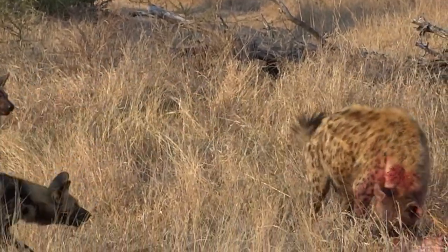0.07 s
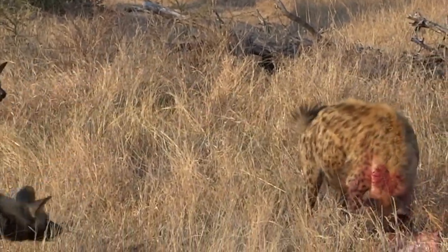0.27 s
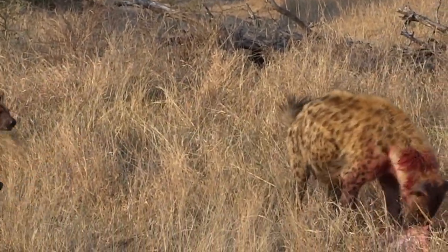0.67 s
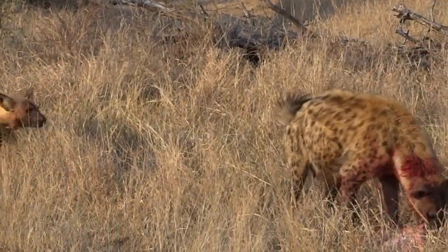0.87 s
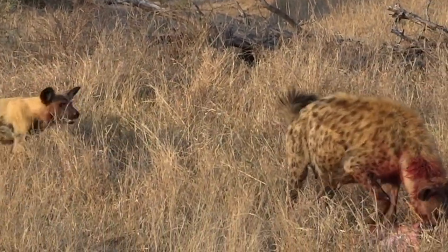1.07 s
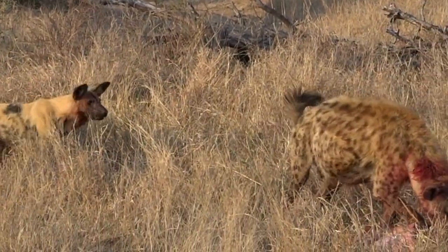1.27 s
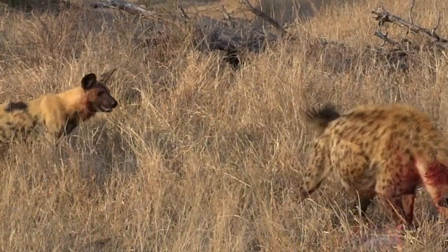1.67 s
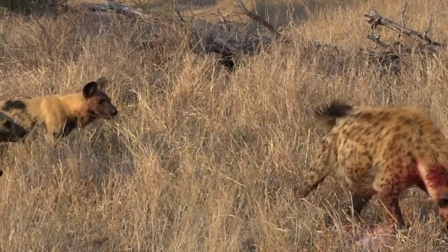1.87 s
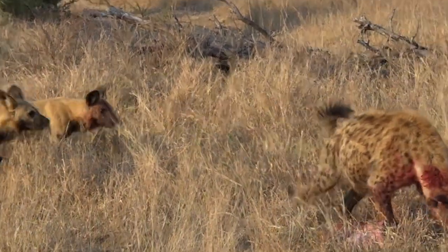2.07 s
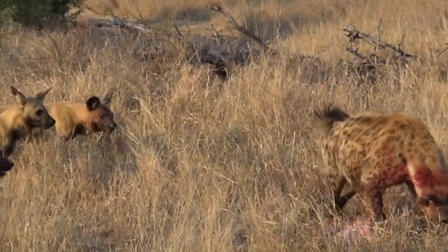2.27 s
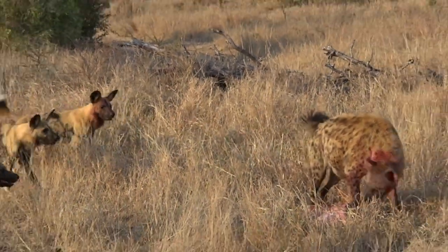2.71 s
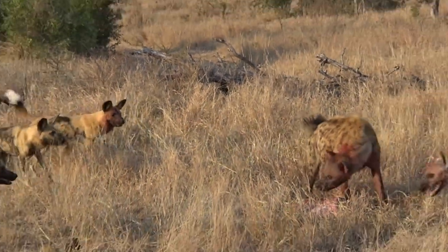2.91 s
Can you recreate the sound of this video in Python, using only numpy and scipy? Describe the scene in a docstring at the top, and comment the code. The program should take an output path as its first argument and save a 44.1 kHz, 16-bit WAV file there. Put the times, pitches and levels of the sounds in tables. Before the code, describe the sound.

Wild dogs twitter in rapid high chirps, with two long squeals over hissing grass.

```python
"""Dry grassland, within earshot of wild dogs mobbing a feeding hyena; nearly mono, leaning right.
The dogs twitter: each chirp is a swooping whistle near 7 kHz, often followed by a short falling yip,
and the rest of the pack peeps further off. From the scuffle come two long arched squeals, a bark, low
grunts and soft whimpers. Grass hisses and rustles throughout; bush and ground scatter the calls back
to the microphone."""
import sys
import numpy as np
from scipy import signal
from scipy.fft import rfft, irfft, next_fast_len
from scipy.io import wavfile
from scipy.ndimage import uniform_filter1d, minimum_filter1d

SR = 44100
rng = np.random.default_rng(int(sys.argv[2]) if len(sys.argv) > 2 else 0)


def pcm_store(signal):
    """Save signal as 16-bit PCM."""
    levels = np.round(np.clip(np.atleast_2d(signal), -1, 1) * 32767)
    wavfile.write(sys.argv[1], SR, levels.astype(np.int16).T)


N = 134505
T = np.arange(N) / SR
CUTOFF_HZ = 15200  # no harmonics above this

# Colour of the grass. Each row: frequency in Hz, gain in dB.
GRASS_COLOUR = [(59, -22), (100, -12), (257, -10.5), (831, -4.5), (962, -2), (1240, -1), (2690, -1.5),
                (4730, -5.5), (7350, 4.5), (15000, -17.5)]
# Its rise and fall. Each row: time in seconds, gain in dB.
GRASS_SWELL = [(0,3.5),(.5,1.5),(.65,-4),(1,6.5),(1.4,4),(1.55,3.5),(1.9,7),(2.08,-1),(2.45,1),(2.9,3),(3.05,-1)]
# Grunts and the bark. Each row: start and length in seconds, pitch at start, middle and end in Hz,
# level in dB, treble tilt in dB, roughness (0 is clean).
GRUNT_CALLS = [(0.114,0.074,259.5,310.3,350,-23.5,4,0.4),(.925,.105,302.7,419,276.4,-18,6,0.43),(1.299,0.091,232.7,260,221,-28.5,-14,1.18),
               (1.417,0.05,214.4,223.2,253,-29.5,-16,0.5),(1.537,0.083,227.5,245.6,168,-32.5,-13.5,1),(1.646,0.069,281,354,314,-34.5,11,0.84),(2.463,0.042,246,294.5,349,-24,3,0.95)]
# Throat resonances of grunts and of yips. Each row: frequency in Hz, gain in dB.
GRUNT_RESONANCES = [(170,2),(260,-4.5),(420,6),(620,-14),(900,4.5),(1250,-10.5),(2100,0.5),(2600,-11.5),(3600,-28.5),(7000,-22)]
YIP_RESONANCES = [(500,-35),(950,-0.5),(1400,-13.5),(1800,0.5),(2200,10.5),(2600,4),(3200,-6.5),(3800,-14),(4600,-11.5),(6500,-32)]
# Short notes. Each row: start and length in seconds, first and last pitch in Hz, level in dB.
YIP_NOTES = [(0.153,0.01,1210,1010,-15.5),(0.724,0.03,1171,783,-16.5),(0.829,0.028,932,670,-25),(.925,0.027,913,907,-23),
             (1.153,0.03,810,630,-37.5),(1.222,0.031,634,470,-36.5),(1.282,0.013,777,724,-22.5),(1.705,0.029,997,811,-19),(1.807,0.041,1024,713,-18.5),
             (1.914,0.034,900,701,-19.5),(2.149,0.0105,1110,914,-23),(2.244,0.028,933,682,-21),(2.343,0.035,855,697,-22.5),(2.57,0.014,1140,930,-14),(2.664,0.017,1220,990,-19.5)]
PEEP_NOTES = [(.516,0.027,8400,8870,-25.5),(.578,0.019,8470,8320,-27),(.607,0.024,7660,9570,-21),(.860,0.0086,7440,5600,-7),(1.043,0.015,6730,7500,-22),
              (1.150,0.012,7400,9200,-18.5),(1.423,0.013,7400,6900,-28),(1.849,0.012,6740,6400,-16.5),(1.945,0.016,7700,9600,-25.5),
              (2.686,0.015,8750,6540,-14),(2.75,0.0068,6230,7800,-16)]
BARK_FUNDAMENTAL = [(.94,0.0974,424,365.5,-21.5)]
WHIMPER_NOTES = [(1.96,0.039,373,293,-42),(2.385,0.047,305,280,-48.5),(2.935,0.044,285,274,-49.5)]
# The twitter. Each row: time of the main dip in seconds, time stretch, trough, crest and dip in Hz,
# crest gain in dB, lead-in against the crest in dB, gain of the upward flick in dB.
CHIRP_CALLS = [(.220,0.73,6280,6600,5200,-8,-18,-7.5),(.324,0.94,5850,6400,4500,-14.5,1.5,-16),(0.706,0.66,5900,6560,5500,-10.5,-11,-10),
               (.813,1.24,4210,6730,4200,0,-13.5,-10.5),(0.915,0.98,5580,6780,4500,-2,-14,-4),(1.106,0.66,7630,7720,7870,-20,-8,-10.5),
               (1.216,0.69,7900,8190,8100,-6,-19,-3),(1.244,0.77,7570,6900,6750,-20.5,-20,-10),(1.324,0.86,6470,7480,6100,-9.5,-9.5,-7),
               (1.358,0.98,6620,6180,6100,-21,-21,-7),(1.686,.75,6460,6690,7000,-17.5,-30,-8),(1.793,0.52,6470,6840,6900,-12,-46,-2.5),
               (1.9,0.81,5760,6780,5750,-3.5,-25,-1),(2.222,1.01,6020,6890,5500,-5.5,-9,-1),(2.327,1.03,5300,6340,5000,-3,-9,-2),
               (2.641,1.2,4490,5670,4200,-1.5,-37,-1)]
# Every chirp's swoop, in seconds from the dip before stretching: entry, trough, crest, dip, flick, top,
# and last the ending, just short of the top.
SWOOP_TIMES = [-.056,-.034,-0.013,0.00015,0.0146,0.044,0.043]
# A chirp's envelope. Each row: seconds from the dip before stretching, gain in dB.
CHIRP_ENVELOPE = [(-.032,-15),(-.02,-7.5),(-.008,2),(0,-1),(.006,-0.5),(0.015,-23.5),(.056,-23)]
# Strength of the whistle, and of its octave against it. Each row: frequency in Hz, gain in dB.
WHISTLE_COLOUR = [(4200,-9),(5400,-11),(6400,-4),(8200,-0.5),(9500,-5),(12000,-10.5)]
WHISTLE_OCTAVE = [(8500,-12.5),(11000,-15.5),(13000,-32.5),(15000,-40)]
# Arch of each squeal. Each row: time in seconds, pitch in Hz.
FIRST_SQUEAL_PITCH = [(.185,403),(.2,509),(.216,689),(.238,886),(.256,964),(.28,998),(.35,1001),(.44,1037),(.47,1027),(.49,988),(.503,892),(.52,616),(.545,442.6)]
SECOND_SQUEAL_PITCH = [(2.468,259.2),(2.5,404),(2.518,496.7),(2.542,612.3),(2.56,707),(2.585,793),(2.61,829),(2.66,888.4),(2.7,899.7),(2.745,895.7),(2.766,850),(2.782,669),(2.81,398)]
# Body of each squeal. Each row: time in seconds, levels of harmonics 1, 2 and 3 in dB.
FIRST_SQUEAL_LEVELS = [(0.187,-60,-42,-26),(0.217,-21.5,-23.5,-18.5),(0.239,-17,-12,-15),(.27,-21,-12.5,-17.5),(.36,-17.5,-10.5,-15),(0.441,-17.5,-10,-11.5),(.485,-16,-12.5,-12),(0.501,-9.5,-13,-19),(0.518,-36,-27,-28.5),(.545,-41,-42,-50)]
SECOND_SQUEAL_LEVELS = [(2.467,-48,-35,-40),(2.497,-35,-24.5,-28.5),(2.533,-12,-21.5,-16.5),(2.56,-25.5,-40,-11),(2.603,-20.5,-16.5,-14),(2.67,-21.5,-19,-18),(2.743,-15.5,-11.5,-18),(2.771,-10,-16,-18.5),(2.783,-23,-27,-18.5),(2.811,-46,-45,-54)]
# Upper harmonics at the top of the arch. Each row: frequency in Hz, dB against harmonics 2 and 3.
FIRST_SQUEAL_OVERTONES = [(1500,16),(3000,4),(4050,-14.5),(5100,-16.5),(6100,-45),(7100,-22),(8100,-17.5),(9200,-26),(10200,-35),(11200,-30),(13200,-58)]
SECOND_SQUEAL_OVERTONES = [(1500,30),(2700,-4.5),(3600,-8.5),(4500,-18.5),(5400,-15.5),(8000,-18.5),(9000,-24.5),(11000,-36),(13200,-36)]
# A squeal is hoarse when low. Each row: pitch in Hz, roughness.
SQUEAL_HOARSENESS = [(300,0.87),(500,0.38),(700,0.25),(900,0.05),(1050,0.04)]
# Scuffs in the grass. Each row: start and length in seconds, level in dB.
SCUFF_STROKES = [(1.464,0.096,-42),(1.56,0.088,-40),(1.627,.013,-38.5)]
# Their band: lower and upper edge in Hz.
SCUFF_EDGES_HZ = [2050, 3450]
# What bush and ground throw back. Each row: frequency in Hz, gain in dB.
BUSH_COLOUR = [(200,-26),(500,-3),(1000,-17.5),(2200,-10.5),(4000,-14.5),(8000,-14)]
# One faint distant return: its delay, then its colour. Each row: frequency in Hz, gain in dB.
FAR_ECHO_S, FAR_ECHO = .18, [(2100, -60), (3050, -40), (4200, -61)]
# Balance at the microphone. Each row: frequency in Hz, left minus right in dB.
STEREO_LEAN = [(560,0.5),(1050,-1.5),(2200,-2.5),(6000,0)]
# The microphone's response. Each row: frequency in Hz, gain in dB.
MIC_RESPONSE = [(30,-12),(100,-11),(165,-5.5),(215,-8.5),(260,0.5),(12500,0),(14500,-9),(16000,-13)]


def from_db(db):
    """Decibels to gain."""
    return 10 ** (np.asarray(db) / 20)


def rms_one(x):
    """Scale to rms 1."""
    return x / np.sqrt(np.mean(x ** 2) + 1e-20)


def at_hz(points, hz):
    """Read a spectrum on a log-frequency axis."""
    f, values = np.transpose(points)
    return np.interp(np.log(np.maximum(hz, 1)), np.log(f), values)


def drift(rate_hz, size):
    """Smooth random wander with spread near 1."""
    pole = np.exp(-2 * np.pi * rate_hz / SR)
    slow = signal.lfilter([1], [1, -2 * pole, pole * pole], rng.standard_normal(size + SR // 4))
    return rms_one(slow)[-size:]


def coloured(x, points, share=1):
    """Filter by a smooth spectrum, its decibels scaled by share."""
    size = next_fast_len(N + SR // 4)
    hz = np.arange(size // 2 + 1) * SR / size
    return irfft(rfft(x, size) * from_db(share * at_hz(points, hz)), size)[:N]


def span(start, end):
    """Sample times of a call."""
    return T[max(int(start * SR), 0):int(end * SR)]


def add(out, t, x):
    """Mix a call in at its time."""
    i = int(round(t[0] * SR))
    out[i:i + len(x)] += x


def gate(t, attack_s, release_s):
    """Rounded onset and ending."""
    rise = np.clip((t - t[0]) / attack_s, 0, 1)
    fall = np.clip((t[-1] - t) / release_s, 0, 1)
    return np.sin(np.pi / 2 * rise) * np.sin(np.pi / 2 * fall)


def voice(hz, gains, rough, jitter=0.0553, shimmer=0.27, rasp=0.47, rasp_hz=130):
    """Harmonics of one pulsing source; roughness shakes its pitch, its strength and each harmonic."""
    size = len(hz)
    phase = 2 * np.pi * np.cumsum(hz * (1 + jitter * rough * drift(105, size))) / SR
    out = np.zeros(size)
    for k, gain in enumerate(gains, 1):
        shake = rasp * rough * (drift(rasp_hz, size) + 1j * drift(rasp_hz, size))
        harmonic = np.exp(1j * (k * phase - k * k * np.pi / 2))
        out += gain * (k * hz < CUTOFF_HZ) * np.real((1 + shake) * harmonic)
    return np.sqrt(2) * out * (1 + shimmer * rough * drift(113, size))


def through_throat(throat, hz, count, treble_db=0):
    """Harmonic gains set by the throat resonances, total power 1."""
    harmonic_hz = np.arange(1, count + 1)[:, None] * hz
    tilt_db = treble_db * np.clip(np.log2(harmonic_hz / 500) / 2, 0, 1)
    gains = from_db(at_hz(throat, harmonic_hz) + tilt_db)
    return gains / np.sqrt(np.sum(gains ** 2, axis=0))


def glides(rows, waver):
    """Short, nearly pure sliding notes that swell and fade."""
    out = np.zeros(N)
    for start, length, start_hz, end_hz, db in rows:
        t = span(start, start + length)
        hz = np.linspace(start_hz, end_hz, len(t)) * (1 + waver * drift(134, len(t)))
        tone = np.sin(2 * np.pi * np.cumsum(hz) / SR)
        add(out, t, from_db(db) * gate(t, length / 2, length / 2) * tone)
    return out


def grass(base_db=-43, flicker_db=1.5, snaps_per_s=600, snaps_against_hiss_db=-7.5):
    """A bright hiss of dry grass, with small snaps of stalks."""
    level = from_db(base_db + np.interp(T, *np.transpose(GRASS_SWELL)))
    hiss = rng.standard_normal(N) * from_db(flicker_db * drift(24.4, N))
    snaps = (rng.random(N) < snaps_per_s / SR) * rng.standard_normal(N)
    snaps *= from_db(1.17 * np.minimum(rng.exponential(1, N), 4))  # a few stand out
    rustle = from_db(snaps_against_hiss_db) * rms_one(coloured(snaps, GRASS_COLOUR))
    return level * (rms_one(coloured(hiss, GRASS_COLOUR)) + rustle)


def far_pack(count=45, faintest_db=-37.5):
    """Faint peeps at random from dogs further off."""
    rows = [(when * (T[-1] - .03), 0.006 + 0.0174 * length,
             6500 + 2000 * first, 6500 + 2500 * last, faintest_db + 6 * loud)
            for when, length, first, last, loud in rng.random((count, 5))]
    return glides(rows, waver=0.0317)


def grunts():
    """Low hoarse grunts and the bark: a rough voice on a curving pitch, shaped by the throat."""
    out = np.zeros(N)
    for start, length, start_hz, middle_hz, end_hz, db, treble_db, rough in GRUNT_CALLS:
        t = span(start, start + length)
        curve = np.polyfit([0, .5, 1], [start_hz, middle_hz, end_hz], 2)
        hz = np.polyval(curve, np.linspace(0, 1, len(t)))
        gains = through_throat(GRUNT_RESONANCES, hz, count=20, treble_db=treble_db)
        envelope = from_db(db) * gate(t, 0.62 * length, 0.54 * length) ** 0.97
        add(out, t, envelope * voice(hz, gains, rough))
    return out


def yips():
    """Voiced notes that fade as their pitch falls ever faster."""
    out = np.zeros(N)
    for start, length, start_hz, end_hz, db in YIP_NOTES:
        t = span(start, start + length)
        progress = np.linspace(0, 1, len(t))
        hz = start_hz + (end_hz - start_hz) * progress ** 1.46
        envelope = from_db(db - 7.3 * progress ** 2) * gate(t, 0.0076, 0.0014)
        add(out, t, envelope * voice(hz, through_throat(YIP_RESONANCES, hz, count=8), rough=0.19))
    return out


def chirps(entry_ratio=1.4, flick_hz=9580, top_hz=11290, rasp_db=-21.5):
    """The dogs' whistles swing down, up, down, then flick upward into a thin trembling tail."""
    out = np.zeros(N)
    shape_s, shape_db = np.transpose(CHIRP_ENVELOPE)
    level_s = np.r_[SWOOP_TIMES[0], -.043, shape_s]  # two lead-in points, then the envelope
    for dip_s, stretch, trough_hz, crest_hz, dip_hz, crest_db, lead_db, flick_db in CHIRP_CALLS:
        *turns_s, end = dip_s + stretch * np.array(SWOOP_TIMES)
        turns_hz = [entry_ratio * trough_hz, trough_hz, crest_hz, dip_hz, flick_hz, top_hz]
        t, steps = span(turns_s[0], end), np.arange(len(turns_s))
        stage = np.interp(t, turns_s, steps)
        eased = np.floor(stage) + (1 - np.cos(np.pi * (stage % 1))) / 2
        waver = 0.0039 + 0.008 * np.clip(stage - 4, 0, 1)  # scratchier after the flick
        hz = np.interp(eased, steps, turns_hz) * (1 + waver * drift(500, len(t)))
        db = np.interp((t - dip_s) / stretch, level_s, np.r_[lead_db - 16, lead_db, shape_db])
        db += np.interp(t - dip_s, [-.004, .003], [crest_db, flick_db]) + at_hz(WHISTLE_COLOUR, hz)
        db += np.clip(5 * drift(150, len(t)), -2, 2)  # quick flutter
        phase = 2 * np.pi * np.cumsum(hz) / SR
        octave_gain = from_db(at_hz(WHISTLE_OCTAVE, 2 * hz)) * (2 * hz < CUTOFF_HZ)
        tone = np.sin(phase) + octave_gain * np.sin(2 * phase)
        rasp = 1 + from_db(rasp_db) * drift(660, len(t))
        add(out, t, from_db(db) * tone * rasp * gate(t, 0.0016, 0.0017))
    return out


def squeal(pitch, levels, overtones, dulling_db_per_octave=19):
    """A long cry that climbs out of a rasp into a clean held note, then dulls as it drops back."""
    t, out = span(pitch[0][0], pitch[-1][0]), np.zeros(N)
    hz = uniform_filter1d(np.interp(t, *np.transpose(pitch)), size=441, mode="nearest")
    hz *= 1 + 0.00075 * drift(31, len(t))
    times, *harmonics_db = np.transpose(levels)
    low_db = [uniform_filter1d(np.interp(t, times, db), size=350, mode="nearest") for db in harmonics_db]
    anchor_db = (low_db[1] + low_db[2]) / 2 + dulling_db_per_octave * np.log2(hz / hz.max())
    upper_db = [anchor_db + at_hz(overtones, k * hz) + 2 * drift(9.2, len(t)) for k in range(4, 16)]
    cry = voice(hz, from_db(low_db + upper_db), rough=at_hz(SQUEAL_HOARSENESS, hz))
    add(out, t, cry * gate(t, 0.0021, 0.0088))
    return out


def peeps():
    """Tiny high whistles among the chirps."""
    return glides(PEEP_NOTES, waver=0.0074)


def bark_tone():
    """The firm falling fundamental inside the hoarse bark."""
    return glides(BARK_FUNDAMENTAL, waver=0.0074)


def scuffs():
    """Short grainy swishes through the stalks."""
    level = np.zeros(N)
    for start, length, db in SCUFF_STROKES:
        t = span(start, start + length)
        add(level, t, from_db(db) * gate(t, length / 10, length / 2))
    band = signal.butter(2, SCUFF_EDGES_HZ, "band", fs=SR, output="sos")
    return level * rms_one(signal.sosfilt(band, rng.laplace(size=N)))


def whimpers():
    """Soft low notes that sag and waver."""
    return glides(WHIMPER_NOTES, waver=0.04)


def bush(x, early_t60_s=0.16, late_t60_s=0.46, late_db=-26.5):
    """Diffuse returns: a quick scatter from nearby, a faint long tail from far off."""
    t = T[:SR]
    decay = from_db(-60 * t / early_t60_s) + from_db(late_db - 60 * t / late_t60_s)
    response = rng.standard_normal(SR) * decay * (t > .002)
    response /= np.sqrt(np.sum(response ** 2))
    return coloured(signal.fftconvolve(x, response)[:N], BUSH_COLOUR)


def far_echo(x):
    """One faint, thin reflection from a distance."""
    return coloured(np.interp(T - FAR_ECHO_S, T, x), FAR_ECHO)


def scene():
    """What reaches the microphone: the calls, their returns and the grass, leaning slightly right."""
    scuffle = squeal(FIRST_SQUEAL_PITCH, FIRST_SQUEAL_LEVELS, FIRST_SQUEAL_OVERTONES)
    scuffle += squeal(SECOND_SQUEAL_PITCH, SECOND_SQUEAL_LEVELS, SECOND_SQUEAL_OVERTONES)
    scuffle += grunts()
    low_cut = signal.butter(6, 195, "high", fs=SR, output="sos")
    calls = signal.sosfilt(low_cut, scuffle + 1e-18)
    calls += chirps() + yips() + peeps() + bark_tone() + whimpers() + far_pack() + scuffs()
    mono = calls + bush(calls) + far_echo(calls) + grass()
    return np.array([coloured(mono, STEREO_LEAN, share=side / 2) for side in (1, -1)])


def record(dry):
    """The microphone thins the bass, a fast limiter holds the peaks under full scale, the top is cut."""
    x = np.array([coloured(channel, MIC_RESPONSE) for channel in dry])
    ceiling, window = .98, 133  # a window of 3 ms
    needed_gain = ceiling / np.maximum(np.abs(x).max(axis=0), ceiling)
    limited = x * uniform_filter1d(minimum_filter1d(needed_gain, size=window), size=window)
    top_cut = signal.cheby2(12, 50, CUTOFF_HZ + 600, fs=SR, output="sos")
    return signal.sosfiltfilt(top_cut, limited)


dry = scene()
out = record(dry)
pcm_store(out)
```